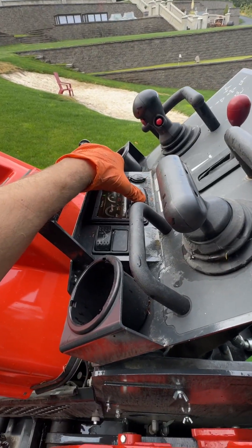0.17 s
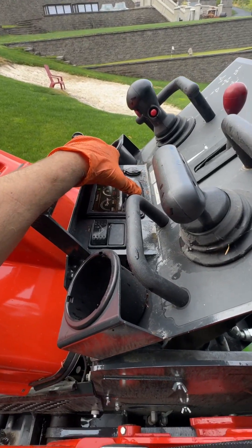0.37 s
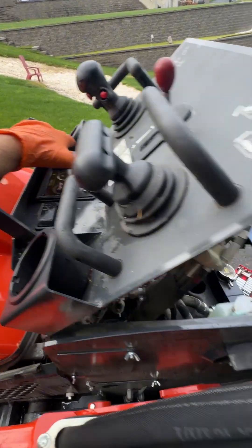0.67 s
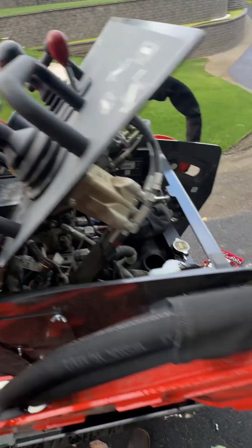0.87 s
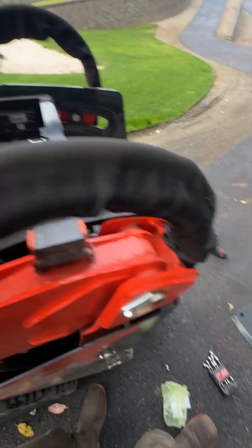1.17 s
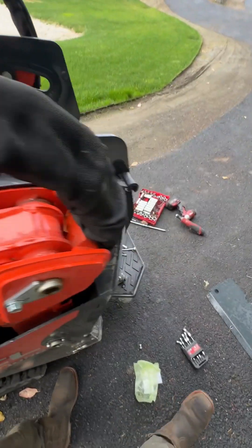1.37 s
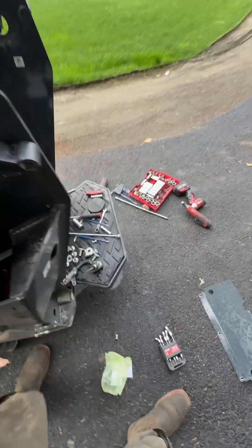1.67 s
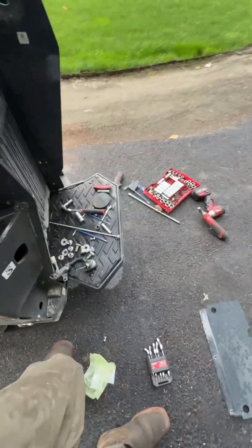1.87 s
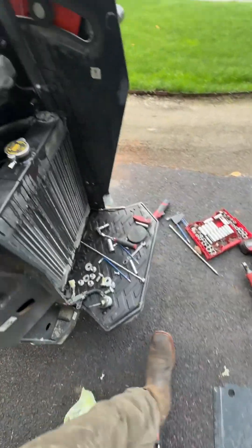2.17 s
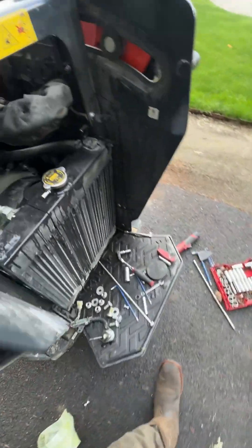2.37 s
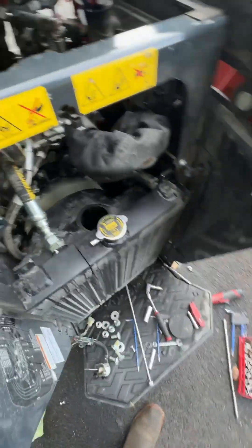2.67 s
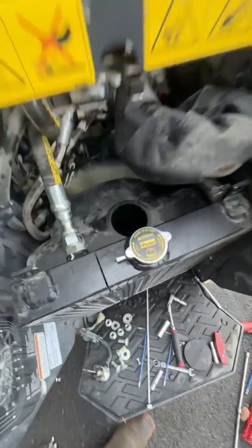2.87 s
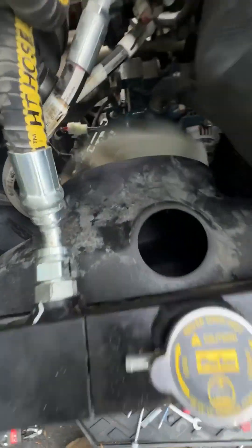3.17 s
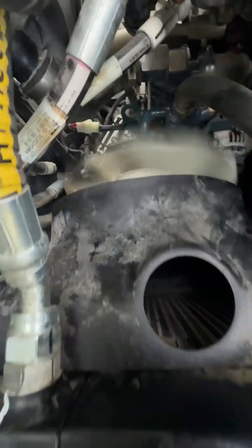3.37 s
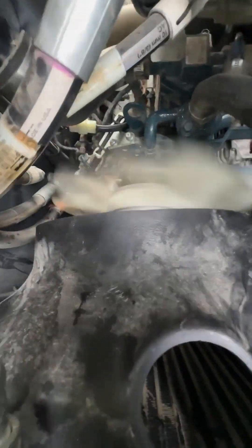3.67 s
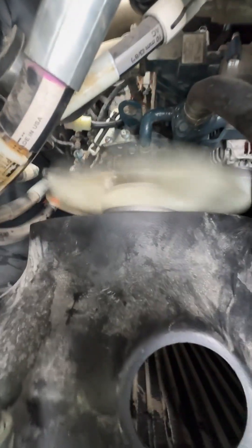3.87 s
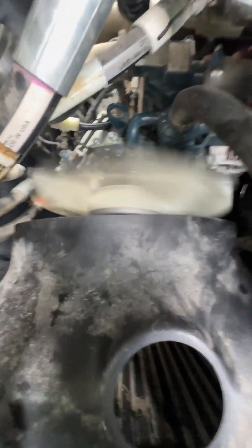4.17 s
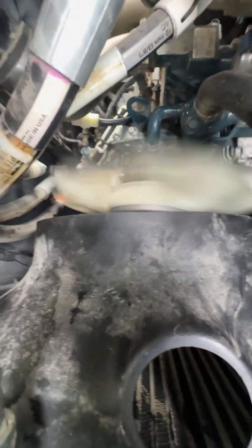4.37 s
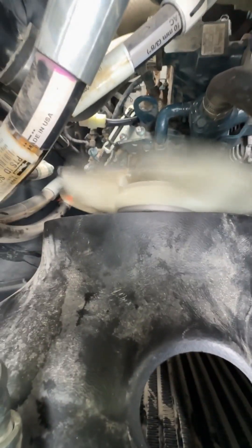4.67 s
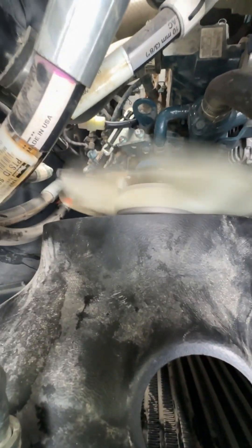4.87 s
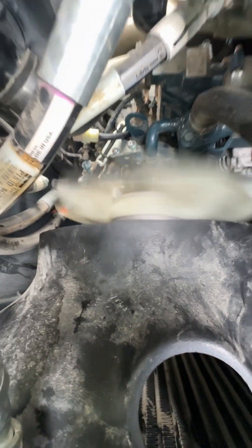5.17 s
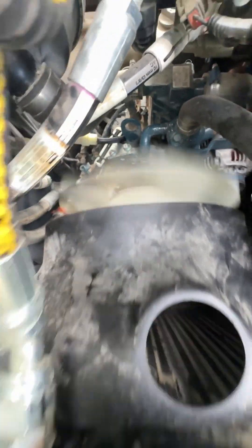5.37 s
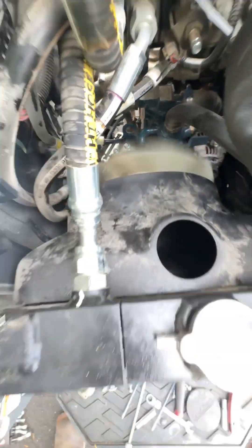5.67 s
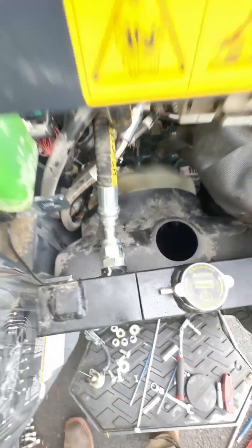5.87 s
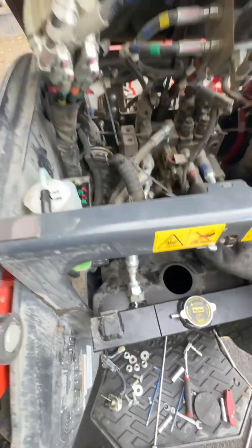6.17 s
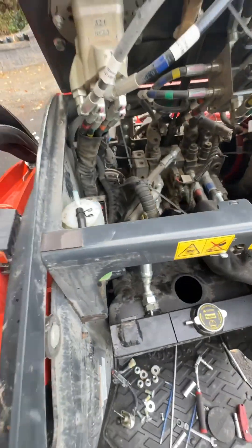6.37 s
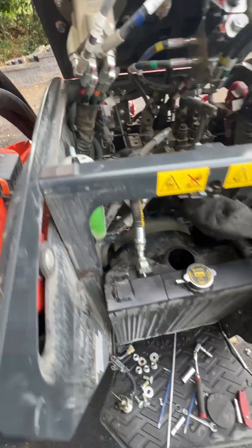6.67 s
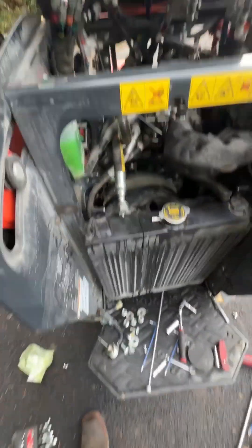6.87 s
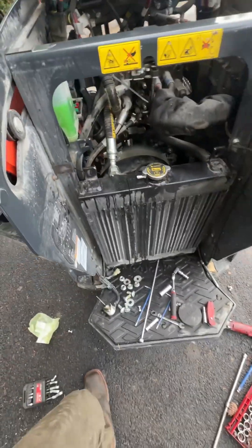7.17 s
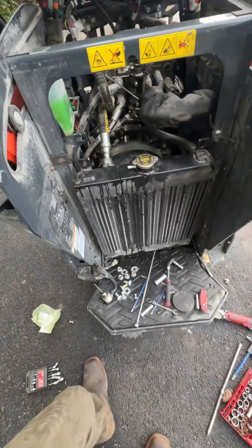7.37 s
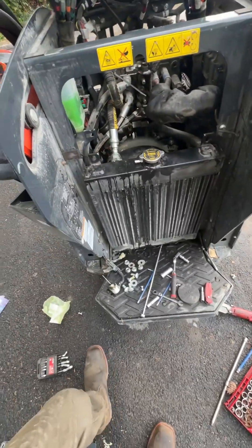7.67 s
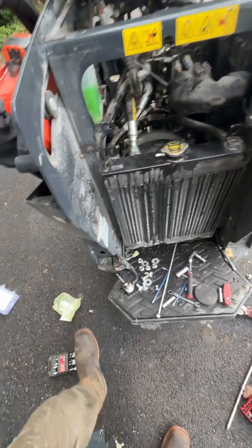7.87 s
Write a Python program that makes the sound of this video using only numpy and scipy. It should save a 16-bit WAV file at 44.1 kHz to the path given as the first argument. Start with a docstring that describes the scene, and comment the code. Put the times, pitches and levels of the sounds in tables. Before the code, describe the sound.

A starter motor whirrs and engages with a clank right at the start. By about 0.2 seconds a small loader's diesel engine catches with a low thump, flares briefly and settles by 0.7 seconds into a steady, fast, knocking idle. It is heard outdoors, first by the seat, where loose panels buzz over a booming exhaust drone; the buzz fades by 2 seconds. From about 2.5 to 5.5 seconds the microphone is close to the open engine bay, and the sound is brighter: dense metallic clatter, occasional sharper knocks, pinging brackets, a faint gear whine and a dull, regularly repeating clunk. From about 5.5 seconds the microphone draws back. The engine keeps the same speed but grows quieter, with less boom, and the knock turns drier and hollow. Just before 8 seconds the sound cuts off abruptly with the engine still running.

```python
"""A starter whirrs and clanks; a small loader's three-cylinder diesel catches at once, flares and settles
to a knocking idle. Every firing puffs through exhaust and intake and rattles the block; a dull clunk
returns once per cycle. We listen outdoors, first by the seat, where loose panels buzz, then at the open
engine bay, full of clatter, gear whine and pinging brackets. As we step back, the knock dries out and
a reflection off the rear door turns it hollow. Just before eight seconds the sound cuts off."""
import sys
import numpy as np
from scipy import signal
from scipy.fft import rfft, irfft, next_fast_len
from scipy.io import wavfile
from scipy.ndimage import map_coordinates

SR = 44100
rng = np.random.default_rng(int(sys.argv[2]) if len(sys.argv) > 2 else 0)


def transcribe(u):
    """Save the signal u as a 16-bit wav file named by the first command-line argument.

    u: samples, shape (n,) or (channels, n), limited to [-1, 1]; the rate is SR.
    q: integer samples, one column per channel.
    """
    v = np.clip(np.atleast_2d(u).T, -1, 1)
    q = np.round(v * 32767).astype(np.int16)
    wavfile.write(sys.argv[1], SR, q)


N = 353285

FIRST_FIRING_S, CUT_S = .175, 7.902
KNOCK_ATTACK_S = .00022  # the fuel lights all at once
MAX_SIGMA = 1.3  # limit on random swings, in standard deviations

# The starter's tones. Each row: start and end in seconds, pitch in Hz, level in dB.
STARTER_TONES = [(0, .3, 415, -43), (0, .1, 861, -46), (.074, .1, 422, -21), (.074, .115, 1227, -27),
                 (.074, .11, 1362, -32), (.1, .17, 355, -32), (.092, .15, 858, -27), (.15, .4, 858, -33),
                 (.1, .13, 3950, -35), (0, .36, 3910, -45), (.13, .3, 2795, -41)]
# The grind of the starter gears. Each row: time in seconds, level in dB.
GRIND_LEVEL = [(0, -38), (.07, -39.5), (.15, -34.5), (.25, -28.5), (.37, -31), (.5, -40), (.65, -42),
               (.9, -100)]
# The colour of that grind. Each row: frequency in Hz, gain in dB.
GRIND_EQ = [(3500, -39), (5300, -10), (6300, -3.5), (9500, -11.5), (16000, -21.5)]
# The pinion hits the ring gear. Each row: time in seconds, level in dB.
PINION_HITS = [(0.072, -31), (0.101, -37)]
# Starter and first firings rock the engine. Each row: time in seconds, level in dB.
MOUNT_KICKS = [(.074, -15), (.163, -11), (.214, -2)]
# The drone's partials. Each row: multiple of the firing rate, path (0 exhaust, 1 panels, 2 intake),
# level in dB.
DRONE_PARTIALS = [(1, 0, -26.5), (2, 0, -1.5), (3, 1, 1.5), (4, 0, -11.5), (5, 2, -6.5), (6, 2, -10),
                  (7, 2, -2.5), (5, 0, -17.5)]
# The exhaust boom along the walk. Each row: time in seconds, level in dB.
EXHAUST_LEVEL = [(0.6, -19), (1.45, -21), (2.5, -28), (3.21, -26), (5.22, -27.5), (5.77, -34.5),
                 (7.33, -39.5), (7.88, -38.5)]
# The clatter fades in as the engine catches. Each row: time in seconds, gain in dB.
CATCH_FADE = [(.15, -37), (.18, -4), (.27, 0)]
# The hardest firings. Each row: time in seconds, strength in dB, crack level in dB, ring pitch in Hz.
HARD_KNOCKS = [(.222, 4.5, -21, 2000), (.324, 2, -14, 1600), (.354, 1, -20, 2300), (.382, 1, -15, 1800),
               (.578, 1, -19, 2050), (.651, 2, -16, 2100), (.759, 1, -19, 2400), (.831, 1, -20, 2400),
               (1.159, 3, -22, 2100), (1.815, 1, -18, 2600), (1.888, 1.5, -15, 2100), (1.998, 0, -15, 2100),
               (2.363, 2, -15, 2300), (2.435, 1, -14, 2100), (3.023, 0, -16, 2300), (3.093, 1, -14, 2800),
               (3.131, 1, -15, 2500), (3.167, 0, -14, 2300), (3.241, 1, -13, 2500), (3.349, 0, -14, 2800),
               (3.386, 1.5, -14, 2600), (3.421, 1, -15, 2400), (3.678, 1.5, -16, 2800),
               (3.715, 2, -14, 2600), (4.187, 4.5, -10, 3300), (4.552, 2, -14, 2900), (5.353, 2, -19, 2400),
               (5.388, 3.5, -18, 2200), (5.426, 1, -21, 2600), (5.754, 2, -25, 2500), (5.974, 2, -23, 2500),
               (6.082, 2, -27, 2500), (6.299, 1.5, -27, 2800), (6.59, 1, -25, 2500), (6.844, 0, -27, 3100),
               (6.953, 0, -26, 3080), (6.989, 1, -26, 2280), (7.062, 0, -26, 3100), (7.243, 0, -25, 2400),
               (7.461, 0, -25, 2400), (7.025, 4, -23, 2100), (7.135, 1.5, -27, 2250), (7.354, 1, -27, 2300),
               (7.17, 0, -27, 3100), (7.279, 0, -22, 3170), (7.496, 1.5, -21, 3160),
               (7.568, 3.5, -24, 2200), (7.714, 2, -20, 3150), (7.786, 3.5, -24, 2900),
               (7.823, 0, -26, 2750), (7.861, 0, -26, 2180), (7.894, 5, -22, 2950)]
# Metal hits in one cycle. Each row: cylinder, delay from its firing in seconds, level in dB.
METAL_HITS = [(0, 0, 10.5), (0, 0.0007, -9), (1, -.003, 0), (1, 0.0011, 9), (1, .004, -6), (1, .0105, -7),
              (2, -.002, -3), (2, 0.0011, 9), (2, .004, 4), (2, .01, -6.5)]
# The casing's dull body. Each row: frequency in Hz, gain in dB.
CASING_EQ = [(120, -40.5), (200, 7.5), (221, -0.5), (243, -12.5), (298, -5.5), (425, -9), (490, -12),
             (535, -3), (650, -13), (705, -5), (1000, -15), (1300, -59.5), (2200, -120)]
# Blows on the casing in one cycle. Each row: cylinder, delay from its firing in seconds, pitch in Hz,
# time to fall 60 dB in seconds, level in dB.
CASING_BLOWS = [(0, 0.0033, 571, 0.049, -8.5), (0, 0.0118, 572, 0.024, 2.5), (0, 0.00057, 348, 0.11, -13),
                (1, .010, 723, 0.076, -11.5), (1, 0.01234, 282, 0.018, -23), (1, .021, 579, 0.022, -12),
                (1, 0.004, 920, 0.045, -3), (2, 0.00664, 417.5, 0.077, -6), (2, 0.01067, 534.5, 0.037, 4),
                (2, 0.00899, 592, 0.025, 5), (2, 0.01113, 312, 0.047, 3.5)]
# The clunk stands out near the fan shroud. Each row: time in seconds, level against the casing in dB.
CLUNK_LEVEL = [(.3, -8), (.8, -8), (1.3, -6), (1.8, -7.5), (2.4, -2.5), (3.3, -2), (5.6, -3), (6.3, -3.5),
               (7.9, -7.5)]
# The block's bright body. Each row: frequency in Hz, gain in dB.
BLOCK_EQ = [(600, -18.5), (780, 1.5), (900, -0.5), (1120, -6), (1560, -10), (1920, -4.5), (2200, 3),
            (2600, -2), (3100, -3.5), (3600, -10.5), (4900, -17), (6500, -20), (10000, -25.5)]
# Ringing covers. Each row: pitch in Hz, width in Hz, level against the block in dB.
COVER_MODES = [(1217, 18, -1), (1355, 10, 0.5), (1786, 43, 0), (2912, 33, -4.5), (3070, 61, -1),
               (6260, 700, -0.5)]
# The timing gears' whine. Each row: multiple of the firing rate, level against the gear case in dB.
WHINE_PARTIALS = [(16, -13), (17, -10.5), (18, -13), (19, -10), (20, -7), (25, -13.5), (26, -10.5),
                  (34, -16), (49, -22), (55, -22), (68, -16)]
# Loose brackets. Each row: pitch in Hz, time to fall 60 dB in seconds, relative level in dB.
BRACKET_MODES = [(1930, 0.11, -18), (2147, 0.091, -16.5), (2330, 0.035, -11.5), (2700, 0.39, -11.5),
                 (2820, 0.08, -15), (3090, 0.053, -7.5), (3304, 0.048, -6)]
# A guard's ring near 2 kHz. Each row: time in seconds, level in dB.
GUARD_LEVEL = [(0.35, -38.5), (1.19, -30.5), (1.31, -46.5), (2.43, -30.5), (5.55, -41.5), (6.24, -46),
               (6.58, -35.5), (7.4, -56), (7.88, -49.5)]
# The hydraulic pump's hum. Each row: time in seconds, level in dB.
PUMP_LEVEL = [(.7, -52), (1.6, -39.5), (3.5, -44), (6, -51.5), (7, -45), (7.9, -44.5)]
# Loose cab panels. Each row: pitch in Hz, width in Hz, level in dB.
PANEL_MODES = [(960, 290, -4), (2002, 51, -0.5), (2790, 36, -6), (3055, 47, 0)]
# Their buzz along the walk. Each row: time in seconds, level in dB.
BUZZ_LEVEL = [(.25, -54), (.36, -26.5), (.6, -30), (1.2, -34), (1.5, -40), (2.1, -59)]
# The walk from the seat to the bay and away. Each row: time in seconds, closeness in dB.
WALK_CLOSENESS = [(.9, -5.5), (1.4, -9), (1.8, -8.5), (2.6, -4), (3.3, -1.2), (4.1, -4), (4.6, -4),
                  (5.5, -8), (6.2, -13), (6.7, -12.5), (7.9, -14.5)]
# How openly we face the block rather than the fan shroud. Each row: time in seconds, view in dB.
BLOCK_VIEW = [(1.45, -3.5), (2.05, 5), (3.2, 1.5), (3.8, -1.6), (5.4, -2.5), (6.1, 0.5)]
# The mix, by part. Each entry: base level in dB, dB per dB of closeness, dB per dB of view,
# then extra dB over the console, beside the cab and in the flare.
PART_MIX = {"panels": (-25, 1.27, -0.3, 4.5, 3, 2), "intake": (-22, 1.36, -0.24, -4.5, -6.5, -16),
            "sump": (-26.5, 0.9153, 0, 8.5, 8.5, 2.5), "gear case": (-25, 1.1, 0, -1.5, 4, -4.5),
            "block": (-27.5, 1, 1, 7.5, 8.5, -3), "knock": (-21.5, 0.99, 0.29, 0.5, -0.5, -2),
            "brackets": (-20, 1.8, -0.06, -9, -14, -0.5), "injectors": (-24, 1.4166, 0, -2, -1.4, -7.5)}
# Stereo width. Each row: frequency in Hz, side minus mid in dB.
STEREO_WIDTH = [(110, -5.5), (250, -23.5), (380, -9.5), (600, -2), (800, -2.5), (1290, -10), (2380, -1),
                (4400, -5), (8100, 0), (15000, 22)]
# Where the machinery sits. Each row: time in seconds, left minus right in dB.
MACHINERY_PAN = [(0.2, 1), (1.96, 1.5), (5.13, 0.5), (6.5, 0.5), (7.4, 0.5)]
# The rear door's reflection. Each row: time in seconds, delay in milliseconds, level in dB.
DOOR_ECHO = [(4.8, 0.71, -31), (5.5, 0.83, -26), (6.6, 0.82, -18), (7.3, 1.02, -18), (7.9, 1.02, -8.5)]
# The bay's echoes fade as we leave. Each row: time in seconds, extra decay in dB per second.
TAIL_DAMPING = [(5.3, 3), (7, 171)]
# The dull top octave. Each row: frequency in Hz, gain in dB.
MASTER_EQ = [(10000, 0.5), (10800, -30.5), (13800, -17), (15000, -9)]


def amp(db):
    """Decibels to gain."""
    return 10 ** (np.asarray(db) / 20)


def unit(x):
    """Scale to rms 1."""
    return x / np.sqrt(np.mean(x ** 2) + 1e-20)


def clock():
    """The time of every sample, in seconds."""
    return np.arange(N) / SR


def eq(points, hz):
    """Gain through (Hz, dB) points on a log frequency axis."""
    knots_hz, db = np.transpose(points)
    return amp(np.interp(np.log(hz + 1), np.log(knots_hz + 1), db))


def curves(rows):
    """One automation curve for each column after the time."""
    times, *columns = np.transpose(rows)
    return [np.interp(clock(), times, column) for column in columns]


def wobble(rate):
    """A smooth random curve, rate knots a second."""
    return map_coordinates(rng.standard_normal(int(N * rate / SR) + 4), [clock() * rate])


def filtered(x, response):
    """Shape x by a frequency response."""
    size = next_fast_len(N + SR // 4)
    return irfft(rfft(x, size) * response(np.fft.rfftfreq(size, 1 / SR)), size)[..., :N]


def band(hz, lo_hz, hi_hz, order=8):
    """Gain of a band-pass with steep sides."""
    return ((1 + (lo_hz / (hz + 1)) ** (2 * order)) * (1 + (hz / hi_hz) ** (2 * order))) ** -.5


def resonance(hz, centre, width):
    """Response of one ringing mode."""
    return 1j * hz * width / (centre ** 2 - hz ** 2 + 1j * hz * width)


def add(track, s, sound):
    """Mix a sound into a track at s seconds."""
    start = max(round(s * SR), 0)
    room = track[..., start:start + sound.shape[-1]]
    room += sound[..., :room.shape[-1]]


def stereo(pair, colour):
    """Colour two unrelated signals as mid (rms 1) and side; return left and right."""
    mid, side = filtered(pair, lambda hz: colour(hz) * np.array([np.ones_like(hz), eq(STEREO_WIDTH, hz)]))
    return np.array([mid + side, mid - side]) / np.std(mid)


def noise(colour):
    """A bed of coloured stereo noise."""
    return stereo(rng.standard_normal((2, N)), colour)


def panned(x, db):
    """Lean a sound to the left by db."""
    return x * amp(np.outer([.5, -.5], db))


def by_place(console, cab):
    """One value over the console, a step to another beside the cab, then a glide to 0 at the bay."""
    return np.where(clock() < 1, console, np.interp(clock(), [1.26, 2.04], [cab, 0]))


def heard_db(part):
    """The level of one part of the machine along the walk."""
    db, per_closeness, per_view, console_db, cab_db, flare_db = PART_MIX[part]
    return (db + per_closeness * curves(WALK_CLOSENESS)[0] + per_view * curves(BLOCK_VIEW)[0]
            + by_place(console_db, cab_db) + flare_db * flare())


def starter(waver=.014, edge_s=.0013, rough_db=4, strike_t60=.19):
    """The pinion engages with a short ring; motor and gears whirr until the engine overruns them."""
    t = clock()
    tones = np.zeros(N)
    for start, end, hz, db in STARTER_TONES:
        gate = np.clip((t - start) / edge_s, 0, 1) * np.exp(-np.maximum(t - end, 0) / edge_s)
        level = amp(db + rough_db * (wobble(330) - .5))
        cycles = np.cumsum(hz * (1 + waver * wobble(150))) / SR
        tones += level * gate * np.sqrt(2) * np.sin(2 * np.pi * cycles)
    grind = noise(lambda hz: eq(GRIND_EQ, hz) * band(hz, 3000, 16000))
    grind *= amp(curves(GRIND_LEVEL)[0] + 2.5 * wobble(160))  # the teeth grind unevenly
    whirr = noise(lambda hz: band(hz, 840, 3900, order=3) / np.sqrt(hz + 1))
    strikes = sum(amp(db - 60 * abs(t - s) / strike_t60) * (t >= s) for s, db in PINION_HITS)
    swell = amp(np.interp(t, [.06, .12, .2, .4, .7], [-37.5, -42.5, -33, -27, -100]))
    return tones + grind + (strikes + swell) * whirr


def jolts(mount_hz=69, rise_s=.009, t60=.072):
    """Each kick sets the engine swinging briefly on its rubber mounts."""
    ages = [(np.maximum(clock() - s, 0), db) for s, db in MOUNT_KICKS]
    return sum(amp(db - 60 * t / t60) * (t / rise_s) * np.sin(2 * np.pi * mount_hz * t) for t, db in ages)


def flare(peak_s=.177, log_width=.59):
    """The overshoot after the catch, 0-1: a quick swell that the governor pulls back."""
    age = np.maximum(clock() - FIRST_FIRING_S, 1 / SR)
    return np.exp(-(np.log(age / peak_s) / log_width) ** 2)


def crank(idle_hz=27.394, shortfall_hz=11.28, run_up_s=.0351, flare_hz=7.14, creep_hz_per_s=.0355):
    """The engine's phase, counted in firings from the first: it runs up, flares and idles."""
    t = clock()
    shortfall = shortfall_hz * np.exp(-np.maximum(t - FIRST_FIRING_S, 0) / run_up_s)
    creep = creep_hz_per_s * np.maximum(t - 2.93, 0)
    phase = np.cumsum(idle_hz - shortfall + flare_hz * flare() + creep) / SR
    return phase - np.interp(FIRST_FIRING_S, t, phase)


def drone(phase, exhaust_flare_db=5, waver_db=.6, rumble_db=-11, stumble_s=.097, stumble_db=-10):
    """Gas pulses boom through exhaust, panels and intake, over a low rumble."""
    exhaust_db = curves(EXHAUST_LEVEL)[0] + exhaust_flare_db * flare()
    intake_db = heard_db("intake")
    paths = (exhaust_db, .063), (heard_db("panels"), .16), (intake_db, .859)  # level, lag in firings
    hum = np.zeros(N)
    for multiple, path, db in DRONE_PARTIALS:
        path_db, lag = paths[path]
        hum += amp(path_db + db + waver_db * wobble(9)) * np.cos(2 * np.pi * multiple * (phase - lag))
    age = clock() - FIRST_FIRING_S
    stumble = np.exp(-(np.maximum(age, 0) / stumble_s) ** 2)  # the first slow firings thump one by one
    running = np.clip(age / .0032 + 2, 0, 1) * amp(stumble_db * stumble * np.sin(np.pi * phase) ** 2)
    rumble = unit(filtered(rng.standard_normal(N), lambda hz: band(hz, 38, 120, order=3)))
    shake_db = np.interp(clock(), [.14, .24, .7], [-10, 3.5, -4])  # the catch shakes the frame
    rumble *= amp(np.maximum(exhaust_db, intake_db) + rumble_db + shake_db)
    return np.sqrt(2) * hum * running + rumble


def firings(strokes, usual_db=.2, scatter_db=1.5, jitter_s=.0005):
    """Time and strength of each combustion; ignition delay varies a little."""
    chance = np.clip(rng.standard_normal((len(strokes), 2)), -MAX_SIGMA, MAX_SIGMA)
    times = strokes + jitter_s * chance[:, 0]
    db = usual_db + scatter_db * chance[:, 1]
    for s, hard_db, _, _ in HARD_KNOCKS:
        nearest = np.argmin(abs(times - s))
        times[nearest], db[nearest] = s, hard_db
    return times, db


def of_cylinder(fired, cylinder):
    """The (seconds, dB) firings of one of the three cylinders."""
    return np.transpose(fired)[cylinder::3]


def rattle(fired, alike, attack_s, t60, tail_db, tail_t60, bed_db, force, lead_s=.0005):
    """Metal hits ring dense modes, partly alike each time: a sharp burst, then a tail in the bay."""
    t = np.arange(SR // 10) / SR
    decay = np.hypot(amp(-60 * t / t60), amp(tail_db - 60 * t / tail_t60))
    envelope = (1 - np.exp(-t / attack_s)) * decay
    track = np.zeros((2, N))
    for cylinder, delay, level_db in METAL_HITS:
        signature = np.sqrt(alike) * rng.standard_normal((2, len(t)))
        for s, db in of_cylinder(fired, cylinder):
            ring = signature + np.sqrt(1 - alike) * rng.standard_normal(signature.shape)
            add(track, s + delay - lead_s, amp(level_db + force * db) * envelope * ring)
    return unit(track) + amp(bed_db) * rng.standard_normal((2, N))  # fan and belt fill the gaps


def clunks(fired, attack_s=.0024, scatter_db=2.5, jitter_s=.000098):
    """Valve gear and gear backlash thump the casing at set crank angles."""
    t = np.arange(SR // 12) / SR
    track = np.zeros(N)
    for cylinder, delay, hz, t60, level_db in CASING_BLOWS:
        ring = np.sin(2 * np.pi * hz * t) * amp(-60 * t / t60) * (1 - np.exp(-(t / attack_s) ** 2))
        for s, _ in of_cylinder(fired, cylinder):
            onset = s + delay + jitter_s * rng.normal()
            add(track, onset, amp(level_db + scatter_db * rng.normal()) * ring)
    return unit(filtered(track, lambda hz: band(hz, 288, 1400)))


def whine(phase, waver_db=2, backlash=.0037):
    """The timing gears sing along with the crank, loosely because of their play."""
    gear = phase + backlash * wobble(40)
    return sum(amp(db + waver_db * wobble(7)) * np.sqrt(2) * np.sin(2 * np.pi * multiple * gear)
               for multiple, db in WHINE_PARTIALS)


def block_ring(hits, lo_hz, hi_hz):
    """Hits sound through one band of the block and its ringing covers."""
    def colour(hz):
        covers = sum(amp(db) * resonance(hz, centre, width) for centre, width, db in COVER_MODES)
        return eq(BLOCK_EQ, hz) * (1 + covers) * band(hz, lo_hz, hi_hz)
    return stereo(hits, colour)


def recoloured(x, phase, patch_hz=420, depth_db=1.5):
    """Each firing favours other modes of the block."""
    hz, t, spectrum = signal.stft(x, SR, nperseg=256)
    firing = np.maximum(np.interp(t, clock(), phase) + 1.1, 0).astype(int)
    chance = rng.standard_normal((firing.max() + 1, len(hz)))
    patches = map_coordinates(chance, np.meshgrid(firing, hz / patch_hz), order=1, mode="nearest")
    gain = unit(amp(depth_db * np.minimum(unit(patches), MAX_SIGMA)))
    return signal.istft(spectrum * gain, SR, nperseg=256)[1][:, :N]


def pings(fired, scatter_db=4.8, late_s=.00197, detune=.01):
    """Each firing shakes the loose brackets by chance, hard firings more."""
    t = np.arange(SR // 12) / SR
    total = np.zeros((2, N))
    for hz, t60, level_db in BRACKET_MODES:
        track = np.zeros((2, N))
        for s, db in np.transpose(fired):
            cycles = hz * (1 + detune * rng.normal()) * t + rng.random((2, 1))
            onset = s + late_s * rng.random()
            hit_db = db + scatter_db * np.clip(rng.normal(), -MAX_SIGMA, MAX_SIGMA)
            add(track, onset, amp(hit_db - 60 * t / t60) * np.sin(2 * np.pi * cycles))
        total += amp(level_db) * unit(track)
    return total


def clatter(phase, guard_hz=1977, guard_width_hz=22):
    """The diesel's knock, layered from the dull sump up to the injector ticks."""
    strokes = np.searchsorted(phase, np.arange(int(phase[-1]) + 1), side="right") / SR
    fired = firings(strokes)
    geared = strokes, fired[1]  # gear-driven parts keep strict time
    casing = rattle(geared, alike=.75, attack_s=.0014, t60=.3,
                    tail_db=1, tail_t60=.23, bed_db=-11.5, force=.19)
    block = rattle(geared, alike=.53, attack_s=.00067, t60=.1,
                   tail_db=-7.5, tail_t60=.14, bed_db=-12, force=.56)
    knock = rattle(fired, alike=.4, attack_s=KNOCK_ATTACK_S, t60=.11,
                   tail_db=-19, tail_t60=.16, bed_db=-13.5, force=.66)
    tick = rattle(fired, alike=.068, attack_s=.0016, t60=.048,
                  tail_db=-8, tail_t60=.18, bed_db=-10, force=.9)
    damping = drier_tails(fired[0])
    body = stereo(casing, lambda hz: eq(CASING_EQ, hz))
    body += amp(curves(CLUNK_LEVEL)[0]) * panned(clunks(geared), .85)
    layers = {"sump": unit(filtered(body, lambda hz: band(hz, 235.7, 463, order=12))),
              "gear case": unit(filtered(body, lambda hz: band(hz, 545, 712))) + whine(phase),
              "block": block_ring(block, 752, 1815),
              "knock": block_ring(damping * recoloured(knock, phase), 1410, 3320),
              "brackets": damping * pings(fired),
              "injectors": block_ring(recoloured(tick, phase, patch_hz=906, depth_db=2), 3676, 13550)}
    guard = stereo(tick, lambda hz: resonance(hz, guard_hz, guard_width_hz))  # rings on between firings
    guard *= amp(curves(GUARD_LEVEL)[0])
    return guard + sum(amp(heard_db(part)) * layer for part, layer in layers.items())


def fan_and_pump(phase, blades_per_firing=6.17, strokes_per_firing=13, slip=.004):
    """The belt-driven fan hums and rushes; the hydraulic pump holds a steady note."""
    def tone(cycles, waver_db=3.5):
        return np.sqrt(2) * np.sin(2 * np.pi * cycles) * amp(waver_db * wobble(4.5))
    air = amp(-13) * noise(lambda hz: band(hz, 120, 170, order=3))
    blades = amp(-12) * tone(blades_per_firing * (phase + slip * wobble(11)))
    pump = amp(curves(PUMP_LEVEL)[0]) * tone(strokes_per_firing * phase)
    return amp(heard_db("intake")) * (blades + air) + pump


def cracks(t60=.04, breadth=.32, ring_db=-7.5, ring_t60=.08, pair_ratio=1.035, side_db=-5):
    """The hardest firings crack sharply and leave a close pair of modes ringing."""
    t = np.arange(SR // 10) / SR
    hz = np.fft.rfftfreq(len(t), 1 / SR)
    attack = 1 - np.exp(-t / KNOCK_ATTACK_S)
    track = np.zeros((2, N))
    for s, _, db, centre in HARD_KNOCKS:
        colour = resonance(hz, centre, breadth * centre) * band(hz, centre / 2, 3700, order=6)
        burst = unit(irfft(rfft(rng.standard_normal((2, len(t)))) * colour, len(t)))
        ring = sum(np.sin(2 * np.pi * (mode_hz * t + rng.random((2, 1))))
                   for mode_hz in (centre, centre / pair_ratio))
        crack = burst * amp(-60 * t / t60) + ring * amp(ring_db - 60 * t / ring_t60)
        mid, side = crack * attack * amp([[db], [db + side_db]])
        add(track, s, np.array([mid + side, mid - side]))
    return track


def panel_buzz(rough_db=5.5):
    """Loose panels near the seat chatter on between the firings."""
    def colour(hz):
        modes = sum((-1) ** k * amp(db) * resonance(hz, centre, width)
                    for k, (centre, width, db) in enumerate(PANEL_MODES))
        return modes * band(hz, 800, 2400, order=4)
    chatter = rng.standard_normal((2, N)) * amp(rough_db * wobble(260))
    return amp(curves(BUZZ_LEVEL)[0]) * stereo(chatter, colour)


def door_reflection(x):
    """The open rear door throws back a copy, later and louder as we withdraw: the clatter goes hollow."""
    t = clock()
    delay_ms, db = curves(DOOR_ECHO)
    echo = np.array([np.interp(t - delay_ms / 1000, t, channel) for channel in x])
    return x + amp(db) * filtered(echo, lambda hz: band(hz, 420, 3300, order=3))


def drier_tails(times, burst_s=.008):
    """Gain that tightens the tail after each knock's burst as we leave the bay's echoes behind."""
    latest = np.maximum(np.searchsorted(times, clock()) - 1, 0)
    age = np.maximum(clock() - times[latest], 0)
    return amp(-curves(TAIL_DAMPING)[0] * (age - burst_s))


def scene():
    """The low end and the machinery, mixed along the walk."""
    phase = crank()
    engine = amp(curves(CATCH_FADE)[0]) * (door_reflection(clatter(phase)) + fan_and_pump(phase))
    machinery = engine + cracks() + panel_buzz() + starter()
    low_end = drone(phase) + jolts()
    low_pan_db = .3 + by_place(console=-7, cab=-7)  # starts on the right, centres at the bay
    return panned(low_end, low_pan_db) + panned(machinery, curves(MACHINERY_PAN)[0])


def record(dry, ceiling=.94, top_hz=16200):
    """The master chain: an abrupt stop, a dull top octave, rounded peaks and a band limit."""
    gate = np.clip((CUT_S - clock()) * 1000, 0, 1)
    dulled = filtered(dry * gate, lambda hz: eq(MASTER_EQ, hz))
    rounded = dulled / (1 + abs(dulled / ceiling) ** 10) ** (1 / 10)
    return filtered(rounded, lambda hz: hz < top_hz)


dry = scene()
out = record(dry)
transcribe(out)
```